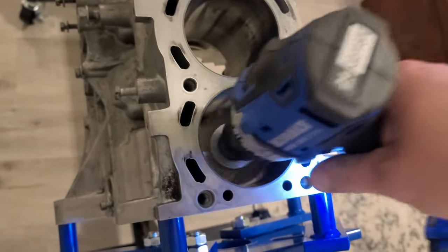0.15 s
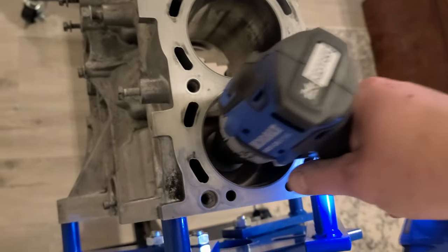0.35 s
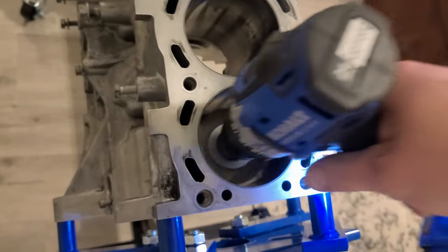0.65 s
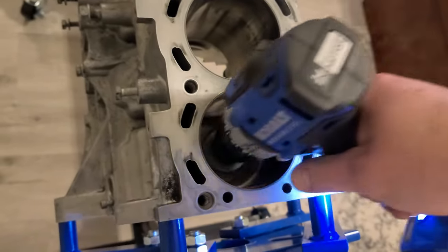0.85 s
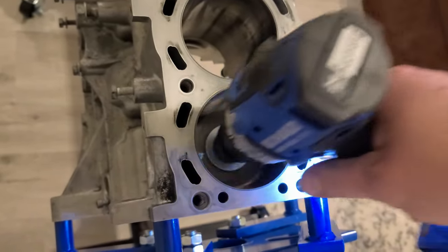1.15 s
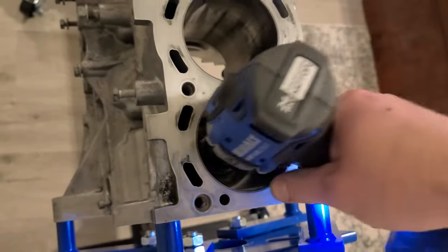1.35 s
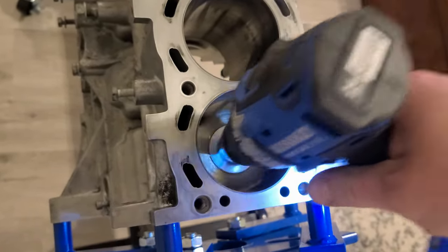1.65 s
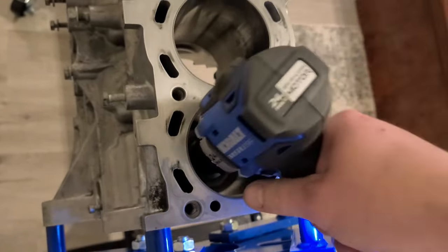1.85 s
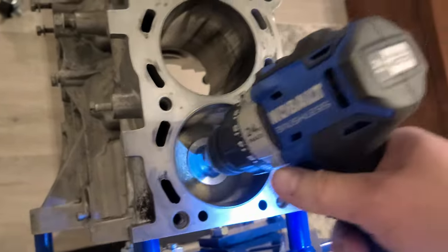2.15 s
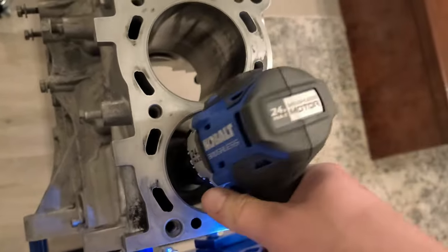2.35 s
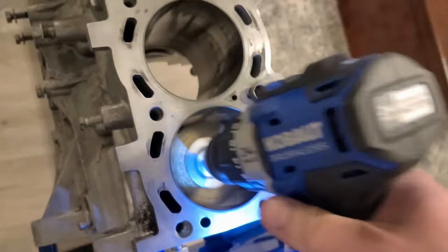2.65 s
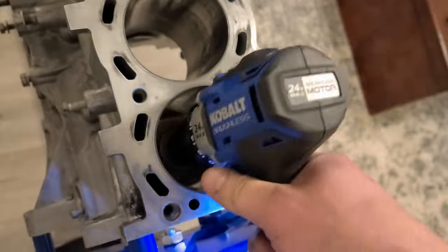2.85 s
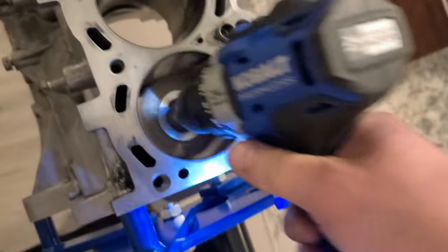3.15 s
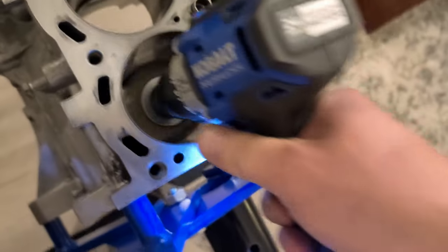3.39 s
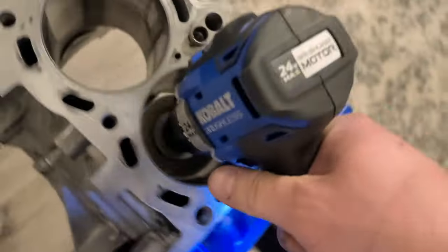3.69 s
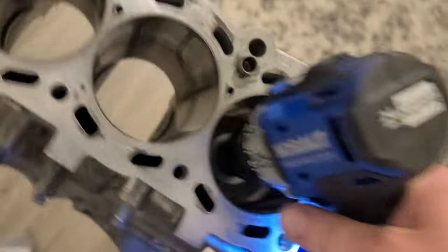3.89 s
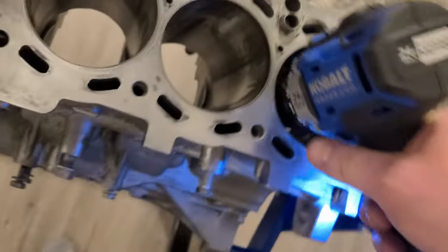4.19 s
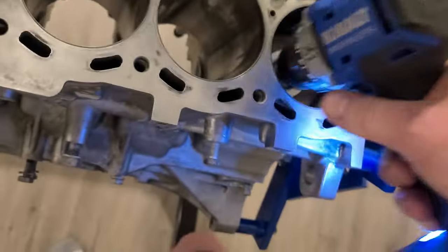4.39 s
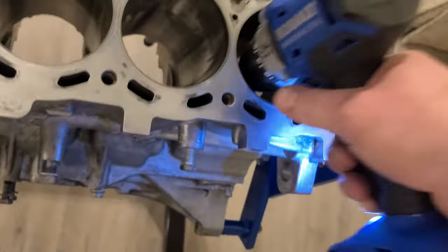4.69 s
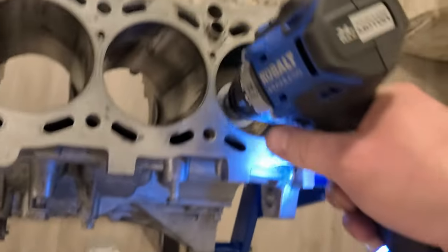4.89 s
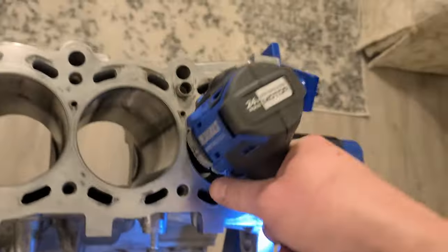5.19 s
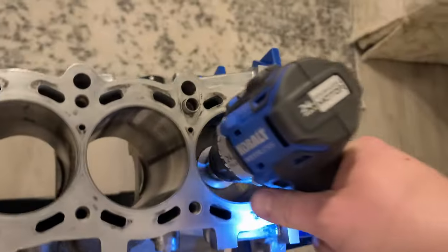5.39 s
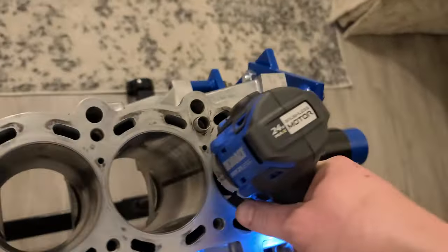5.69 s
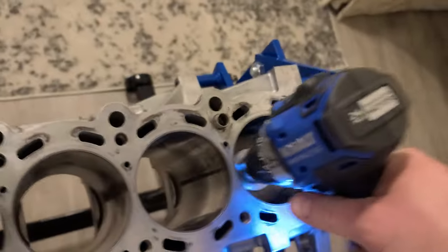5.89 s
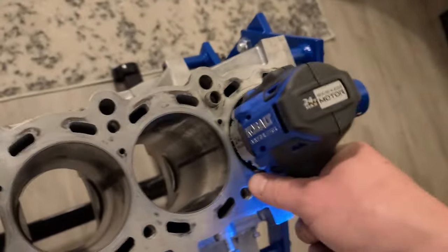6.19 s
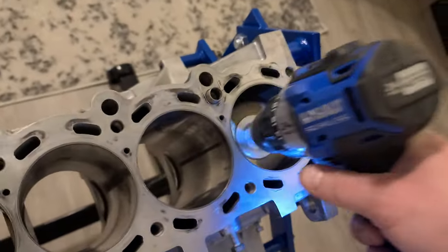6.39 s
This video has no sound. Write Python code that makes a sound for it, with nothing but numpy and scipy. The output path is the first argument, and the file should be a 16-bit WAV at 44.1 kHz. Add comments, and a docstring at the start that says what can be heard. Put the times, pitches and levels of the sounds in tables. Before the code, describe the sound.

A cordless drill whines at a high steady pitch while its wire brush hisses and rasps inside a hollow metal bore, sagging briefly once.

```python
"""Inside the cylinder bore of an engine block, a cordless drill drives a wire brush, close to a handheld camera.
The motor's fan whistles over magnet whine, gear tones and a low rush, all but the rush tied to one shaft angle.
Most plunges slow the motor a little; once the brush bites and the pitch sags, then recovers.
Thousands of random bristle flicks rasp, hiss and ring the bore and its wall through spectral filters.
The whistle swells differently in each ear, and low rumble rises as the hand shifts on the camera."""
import sys
import numpy as np
from scipy import signal
from scipy.fft import rfft, irfft
from scipy.io import wavfile
from scipy.ndimage import uniform_filter1d

SR = 44100
rng = np.random.default_rng(int(sys.argv[2]) if len(sys.argv) > 2 else 0)


def store_pcm(level_fs):
    """Save levels as 16-bit WAV."""
    pcm = np.round(np.clip(level_fs, -1, 1) * 32767).astype(np.int16)
    wavfile.write(sys.argv[1], SR, np.atleast_2d(pcm).T)


N = 288414
TIME = np.arange(N) / SR
FFT_SIZE, OVERLAP = 1024, 768  # samples
BINS_HZ = np.fft.rfftfreq(FFT_SIZE, 1 / SR)[:, None]
SPINDLE_RATIO = .075  # brush turns per motor turn


def amp(db):
    """Decibels to gain."""
    return 10 ** (np.asarray(db) / 20)


def evened(x):
    """Scales to rms 1."""
    return x / np.sqrt(np.mean(abs(x) ** 2) + 1e-20)


def curves(rows, t=TIME):
    """Every column of a table after the time, joined by straight lines."""
    seconds, *columns = np.transpose(rows)
    return [np.interp(t, seconds, column) for column in columns]


def read(points):
    """A spectral curve joined by straight lines on a log-frequency axis."""
    hz, value = np.transpose(points)
    return np.interp(np.log(BINS_HZ + 1), np.log(hz + 1), value)


def frame_centres():
    """Times of the spectral frames, in seconds."""
    return signal.stft(TIME, SR, nperseg=FFT_SIZE, noverlap=OVERLAP)[1]


def wander(rate_hz):
    """Smooth random drift of rms 1, with little movement faster than rate_hz."""
    size, slow_rate = 2 ** 14, 2000  # samples, samples/s
    hz = np.fft.rfftfreq(size, 1 / slow_rate)
    spectrum = rfft(rng.standard_normal(size)) / (1 + (hz / rate_hz) ** 4)
    return np.interp(TIME, np.arange(size) / slow_rate, evened(irfft(spectrum)))


def patches(shape, frames, bins):
    """A smooth random field of rms 1 over frequency and time."""
    field = rng.standard_normal(shape)
    for axis, size in ((1, frames), (0, bins)):
        window = np.expand_dims(np.hanning(size), 1 - axis)
        field = signal.fftconvolve(field, window, "same")
    return evened(field)


def resonance(hz, width_hz):
    """Gain of a resonance, halved width_hz to either side of its peak."""
    return 1 / (1 + ((BINS_HZ - hz) / width_hz) ** 2)


# stereo of the two microphone ports: (frequency [Hz], likeness [-1..1])
LIKENESS = [(40, 0.14), (300, 0.9), (700, 0.72), (1700, 0.5), (2600, 0.6), (3500, 0.3), (4200, 0.23),
            (6000, 0.26), (8000, 0.02)]
# (frequency [Hz], phase by which left leads [rad])
LEAD = [(100, 0), (450, -0.3), (750, -0.65), (1300, 0), (1900, -0.5), (2400, 0.72), (3000, 1.4),
        (3800, 0.5), (5600, 0), (6400, 3.5)]
# (frequency [Hz], left minus right [dB])
BALANCE = [(550, 0), (800, 4.5), (2050, 5.5), (2600, 3.5), (3300, 0), (5600, -0.5), (7300, 2.5), (8700, 0),
           (10500, 2.5)]


def coloured(pair, gain, ripple_db=0.):
    """Two unrelated signals take a colour, ripple with shifting reflections and reach two ports partly alike."""
    a, b = signal.stft(pair, nperseg=FFT_SIZE, noverlap=OVERLAP)[2]
    reflections = patches(a.shape, frames=70, bins=5)
    gain = gain * amp(ripple_db * reflections)
    same = np.clip(read(LIKENESS), -1, 1)
    right = (same * a + np.sqrt(1 - same ** 2) * b) * np.exp(-1j * read(LEAD))
    tilt = amp(read(BALANCE) / 2)
    ports = np.array([a * tilt, right / tilt]) * gain / np.sqrt(tilt ** 2 + tilt ** -2)
    sound = signal.istft(ports, nperseg=FFT_SIZE, noverlap=OVERLAP)[1]
    return evened(sound[:, :N])


def tone(phase, scatter, lag=0., pan_db=0., drift_hz=5.):
    """A tone in both ears, its direct path mixed with drifting reflections from block and walls."""
    echoes = np.array([wander(drift_hz) + 1j * wander(drift_hz) for ear in range(2)]) / np.sqrt(2)
    direct = np.array([[1], [np.exp(-1j * lag)]])  # lag of the right ear in radians
    paths = evened(direct + scatter * echoes)
    pan = amp([[pan_db / 2], [-pan_db / 2]])
    return np.sqrt(2) * (paths * np.exp(1j * phase)).real * pan


# strokes down the bore, about two a second: (time at the bottom [s], motor slowdown there [turns/s])
PLUNGES = [(-.2, 1.24), (.32, 1.97), (.8, 2.0), (1.3, 1.47), (1.84, 1.25), (2.35, 1.7), (2.85, 0.5),
           (3.32, 0), (3.71, -0.5), (4.27, 1.9), (4.78, 2), (5.2, 2.0), (5.72, 1.8), (6.21, 2), (6.72, 1)]


def plunge():
    """Depth of the brush swings as a cosine: 0 at the top of a stroke, 1 at the bottom."""
    strokes = np.interp(TIME, np.transpose(PLUNGES)[0], np.arange(len(PLUNGES)))
    return .5 + .5 * np.cos(2 * np.pi * strokes)


FREE_HZ = 372.0  # motor turns/s before any slowdown
BITE_AT_S, BITE_S, RECOVER_S = 2.546, .165, .045
BITE_SAG_HZ = 67  # turns/s, before the corners are rounded


def sag(depth):
    """Turns a second the motor loses: a little on most plunges, a lot when the brush bites."""
    drag, = curves(PLUNGES)
    since = TIME - BITE_AT_S
    grip = np.clip(since / BITE_S, 0, 1)
    release = np.exp(-np.maximum(since - BITE_S, 0) / RECOVER_S)
    # the rotor's inertia rounds the corners
    bite = uniform_filter1d(BITE_SAG_HZ * grip * release, size=1300)
    return drag * (.15 + .85 * depth) + bite + .27 * wander(22)


# fan whistle, brush at the top of the bore:
# (time [s], left level [dB], right level [dB], left-right likeness [clipped to -1..1])
WHISTLE = [(0.0, -53.5, -31, 0.01), (0.05, -31.5, -26, 0.93), (0.35, -35.5, -41, 0.24),
           (0.4, -33.1, -28.2, 0.95), (0.51, -42.9, -36.5, 0.11), (0.56, -33, -25.5, 0.58),
           (0.79, -34.5, -36, 0.55), (1.06, -39, -30.9, 0.51), (1.12, -32.5, -28, 0.59),
           (1.34, -31, -34, -1.4), (1.39, -32.5, -32.5, 0.56), (1.65, -31.3, -27.5, 0.7),
           (1.88, -34, -42, -0.51), (1.93, -30, -32, 0.64), (2.41, -31.5, -37.1, -0.3),
           (2.47, -30, -34.4, 0.73), (2.57, -43.0, -33, 0.52), (2.69, -32.5, -32, 0.95),
           (2.79, -38, -31, -0.44), (2.84, -41.2, -38.5, -0.3), (2.99, -36, -28.5, 0.5),
           (3.05, -52, -35.2, -0.36), (3.21, -31, -31, 0.68), (3.28, -30.7, -30, -1.14),
           (3.49, -33, -36, 0.29), (3.54, -38.5, -33, 0.07), (3.68, -30, -38, -0.45),
           (3.79, -41.6, -27.8, -0.31), (3.96, -43, -32.5, -0.56), (4.03, -27.5, -27, -0.98),
           (4.15, -37, -29.5, -0.73), (4.26, -31, -33.5, 0.84), (4.6, -32, -29.5, -0.85),
           (4.67, -32.5, -30, 0.86), (4.82, -34, -51, -0.33), (4.87, -25.5, -31.9, 0.81),
           (5.04, -36, -35, 0.98), (5.15, -38.5, -31.4, -0.38), (5.21, -29, -37.6, -0.39),
           (5.36, -37, -29.5, 0.84), (5.44, -49, -39.5, 0.2), (5.6, -29.5, -27, 0.48),
           (5.7, -35.6, -43, 0.81), (5.88, -32.2, -29.8, 0.95), (5.93, -28.5, -29, -0.61),
           (6.23, -32.7, -32, 0.85), (6.34, -32, -26.5, 0.029), (6.54, -35.3, -28.5, -1.2)]
# fan overtones at mid-stroke, before trim: (time [s], second harmonic level [dB], third harmonic level [dB])
OVERTONES = [(0.0, -39, -42), (0.33, -44.5, -47), (0.66, -43.5, -39.2), (0.75, -40.5, -44),
             (0.99, -41.5, -39), (1.66, -42.5, -42.5), (2.73, -41.5, -46), (2.81, -35, -38.4),
             (3.15, -47.5, -48.5), (3.39, -39.5, -40), (3.73, -44, -44), (3.97, -37, -49.0),
             (4.47, -46.2, -42), (5.13, -44, -45), (5.22, -45, -52.1), (5.55, -46, -44), (5.88, -44, -50.7),
             (6.04, -48, -45), (6.21, -44.9, -45), (6.54, -39.5, -48.5)]
BLADES = 13
HIDDEN_DB = 3  # right-ear loss at the bottom of a plunge


def fan(angle, depth, shade_db):
    """Blades whistle at 13 cycles a motor turn, with two harmonics; the brush's turning shakes the whistle."""
    left_db, right_db, likeness = curves(WHISTLE)
    second_db, third_db = curves(OVERTONES)
    spindle = SPINDLE_RATIO * angle
    blade = BLADES * angle + .07 * np.sin(spindle) + .04 * wander(70)
    # reflections from the block pull the two ears out of step
    apart = np.arccos(np.clip(likeness, -1, 1)) / 2 + 0.16 * wander(9)
    left = amp(left_db) * np.cos(blade + apart)
    right = amp(right_db - HIDDEN_DB * depth) * np.cos(blade - apart)
    shake = np.array([
        1 + 0.063 * np.sin(spindle + ear) + 0.03 * np.sin(2 * spindle) + 0.24 * wander(15)
        for ear in range(2)])
    whistle = np.sqrt(2) * np.array([left, right]) * shake
    second = tone(2 * blade, scatter=0.49, lag=1.54, pan_db=.5, drift_hz=15.4)
    third = tone(3 * blade, scatter=0.4, lag=1.6, pan_db=2.0, drift_hz=22)
    second_gain = amp(second_db + shade_db + 0.4)
    third_gain = amp(third_db + 1.8 * shade_db - 0.5)
    return whistle + second_gain * second + third_gain * third


# magnet whine, before trim: (time [s], level [dB])
MAGNET = [(0, -49.5), (.35, -36), (.58, -45.5), (.83, -35.5), (1.05, -42), (1.35, -38), (2.07, -41.5),
          (2.4, -29.5), (2.6, -38.5), (2.69, -49), (2.77, -27), (2.86, -35), (3.15, -36), (3.31, -37),
          (3.5, -41.5), (3.75, -42), (4.18, -37), (4.39, -44), (4.85, -45), (5.1, -39.5), (5.55, -36.5),
          (5.71, -36), (6.54, -42.5)]
# weak tones of gears and shaft: (pitch [cycles per motor turn])
GEAR_ORDERS = [.25, .294, .324, 1, 11, 11.25, 11.5, 12.25, 16]
# the same tones at top speed: (level [dB])
GEAR_DB = [-68, -76.5, -70.5, -60.5, -57, -53.5, -48.5, -84, -52.5]
MAGNET_ORDER = 8  # cycles per motor turn


def drive(angle, speed):
    """Magnet whine, shaft hum and gear tones follow the motor; play in the teeth blurs the higher ones."""
    magnet_db, = curves(MAGNET)
    whine = tone(MAGNET_ORDER * angle, scatter=0.26, lag=-2.3, pan_db=4.5, drift_hz=8.2)
    magnet = amp(magnet_db - 0.4) * whine
    gears = 0
    for order, db in zip(GEAR_ORDERS, GEAR_DB):
        play = 0.018 * wander(28)
        gear = tone(order * (angle + play), scatter=.5 + 0.12 * order, drift_hz=6.7)
        gears = gears + amp(db) * gear
    # the teeth strike more softly as the motor slows
    return magnet + gears * (speed / speed.max()) ** 3


# low rush of the drill's case: (frequency [Hz], relative density [dB per Hz])
DRONE = [(30, -18), (150, -10), (350, 1), (550, 1.5), (1200, -19)]


def housing():
    """A steady low rush of filtered noise from the drill's case."""
    return amp(-52) * coloured(rng.standard_normal((2, N)), amp(read(DRONE)), ripple_db=2.5)


def bristles(angle, per_s, spread_db, throb_db, grab_db):
    """Wire tips flick free as random impulses, their force throbbing with brush turns and gear beats."""
    gear_a, gear_b = GEAR_ORDERS[0] * angle, GEAR_ORDERS[1] * angle
    beats = np.sin(SPINDLE_RATIO * angle) + 0.39 * np.sin(gear_a) + 1.0 * np.sin(gear_b)
    planets = np.sin(3 * gear_a)
    force = amp(throb_db * (beats + planets) + grab_db * wander(180))
    size = amp(spread_db * np.minimum(rng.exponential(1, (2, N)), 3))
    sign = rng.choice([-1, 1], (2, N))
    flicked = rng.random((2, N)) < per_s / SR
    return force * size * sign * flicked


# scrubbing at mid-stroke, before trim:
# (time [s], rasp level [dB], bore ring level [dB], wall ring level [dB])
SCRUB = [(0.0, -42.7, -38.6, -38.3), (1.16, -42.5, -37.4, -38.5), (1.32, -43, -40, -35.5),
         (1.66, -41.5, -41.5, -39), (2.15, -43.6, -36, -36.5), (2.4, -44.5, -39, -35),
         (2.73, -47.5, -36, -39.5), (2.81, -43.5, -33, -34.5), (3.06, -42.7, -36.5, -35.5),
         (3.31, -43.5, -35, -39), (3.39, -40, -40.5, -34), (3.97, -40, -39, -36.5), (4.06, -45.5, -33, -40),
         (4.47, -47, -33.5, -38.5), (4.88, -45.5, -35, -37), (4.97, -46.5, -34, -40),
         (5.22, -46, -36.5, -36), (5.55, -43.0, -35.4, -34.5), (5.63, -45.5, -37, -35.5),
         (6.54, -44.5, -38.5, -37.5)]
# bristle hiss at mid-stroke, before trim: (time [s], level [dB], tilt above 10 kHz against below [dB])
SIZZLE = [(0.0, -33, -7.5), (0.91, -32.5, -6.0), (1.32, -32.5, -8.5), (1.9, -33.5, -6), (1.99, -33.7, -5.5),
          (2.65, -34, -6), (2.73, -34, -8), (2.9, -33, -5.4), (4.06, -32, -6.5), (4.72, -32.5, -5.5),
          (4.88, -32.5, -7.5), (5.05, -35.2, -4), (5.22, -33.5, -5.5), (6.54, -33.8, -5.1)]
# air resonance of the bore, moving with the brush: (time [s], frequency [Hz])
BORE = [(0, 1640), (1.5, 1630), (2.1, 1690), (3.0, 1730), (3.6, 1670), (4.55, 1570), (5.35, 1690),
        (6.54, 1650)]
# colour of the rasp: (frequency [Hz], relative density [dB per Hz])
RASP = [(250, -18.5), (620, -6.5), (800, 0.5), (1100, -1), (1350, 2), (2000, -6), (3400, -14.5),
        (6000, -32)]
# colour of the hiss before its tilt: (frequency [Hz], relative density [dB per Hz])
HISS = [(500, -18), (2200, -1), (3100, 2), (3550, 2.5), (4250, 5), (5200, 2.5), (6200, 1.5), (7300, -2),
        (8500, -3.5), (9300, -3), (10100, -8.5), (11200, -4.5), (13000, 2), (14300, -3.5)]
BORE_DIP_DB, HISS_DIP_DB = 1.5, 0.4  # loss from top to bottom of a stroke


def brush(angle, depth):
    """Bristle flicks rasp on the metal, ring the air in the bore and the wall around it, and hiss."""
    rasp_db, bore_db, wall_db = curves(SCRUB)
    hiss_db, _ = curves(SIZZLE)
    sunk = depth - .5
    frame_times = frame_centres()
    bore_hz, = curves(BORE, frame_times)
    _, bright_db = curves(SIZZLE, frame_times)

    def flicks():
        """A fresh set of coarse flicks for each part of the scrubbing."""
        return bristles(angle, per_s=10000, spread_db=2.5, throb_db=-0.14, grab_db=.5)

    rasp = amp(rasp_db + 1) * coloured(flicks(), amp(read(RASP)), ripple_db=1.97)
    bore_gain = amp(bore_db - BORE_DIP_DB * sunk - 3.0)
    bore = bore_gain * coloured(flicks(), resonance(bore_hz, width_hz=234))
    wall_modes = resonance(2505, width_hz=230) + resonance(2840, width_hz=340)
    wall = amp(wall_db - 2.2) * coloured(flicks(), wall_modes, ripple_db=2.0)
    # the top of the hiss comes and goes as the drill wobbles
    wobble_db = np.interp(frame_times, TIME, 0.51 * wander(6))
    top = .5 + np.tanh((BINS_HZ - 10000) / 1000) / 2
    hiss_colour = amp(read(HISS) + (bright_db + wobble_db + 5.9) * top)
    fine = bristles(angle, per_s=14000, spread_db=2.0, throb_db=0.17, grab_db=1.03)
    hiss_gain = amp(hiss_db - HISS_DIP_DB * sunk - .5)
    hiss = hiss_gain * coloured(fine, hiss_colour, ripple_db=2.5)
    return rasp + bore + wall + hiss


# colour of the handling rumble: (frequency [Hz], relative density [dB per Hz])
RUMBLE = [(10, -13), (45, -7), (90, 0), (200, -10.5), (500, -18.5)]
# swells as the hand shifts: (time of peak [s], time to fall to 1/e [s], level added at peak [dB])
SHIFTS = [(2.33, .1, -60), (2.95, .07, -59), (4.18, .09, -49), (4.32, 0.11, -53), (6.35, .15, -63)]
GRIP_DB = -67.5  # steady rumble between shifts


def handling():
    """Low rumble as the camera is carried round the block, swelling at each shift of the hand."""
    swells = sum(amp(db) * np.exp(-((TIME - peak) / half) ** 2) for peak, half, db in SHIFTS)
    rumble = coloured(rng.standard_normal((2, N)), amp(read(RUMBLE)))
    return (amp(GRIP_DB) + swells) * rumble


# fan overtones: level range from top to bottom of a stroke, and loss per turn/s lost (1.8 times on the third)
SINK_DB, FADE_DB_PER_HZ = 2.5, 0.1


def scene():
    """The strokes load the motor; one shaft angle drives fan, gears and brush."""
    depth = plunge()
    lost_hz = sag(depth)
    speed = FREE_HZ - lost_hz
    angle = 2 * np.pi * np.cumsum(speed) / SR
    shade_db = -SINK_DB * (depth - .5) - FADE_DB_PER_HZ * lost_hz
    machine = fan(angle, depth, shade_db) + drive(angle, speed) + housing()
    return machine + brush(angle, depth) + handling()


def record(dry):
    """The recorder's band limit: a steep low-pass at 15.75 kHz."""
    lowpass = signal.firwin(701, 15750, window=("kaiser", 9), fs=SR)
    return signal.oaconvolve(dry, lowpass[None], "same")


dry = scene()
out = record(dry)
store_pcm(out)
```